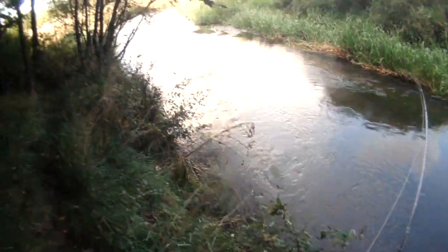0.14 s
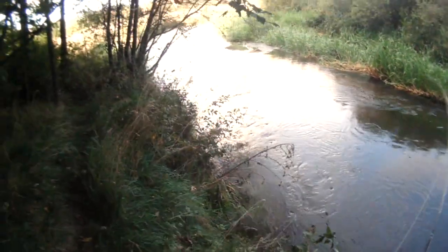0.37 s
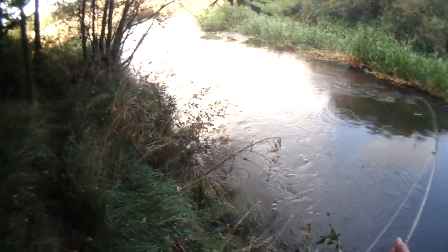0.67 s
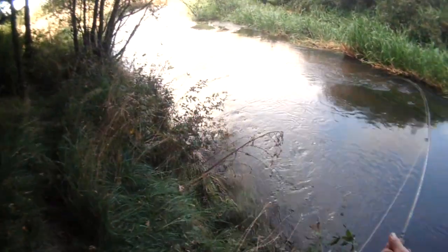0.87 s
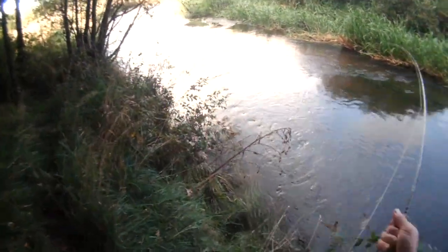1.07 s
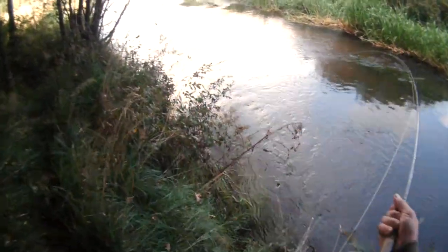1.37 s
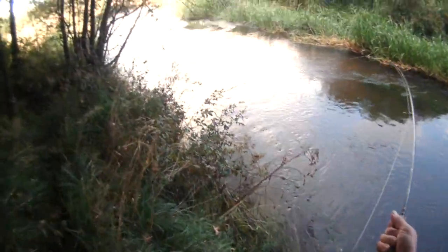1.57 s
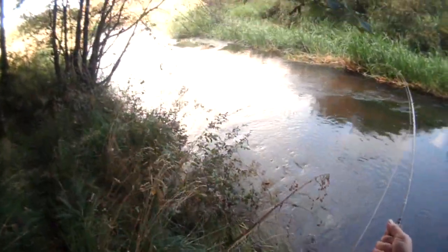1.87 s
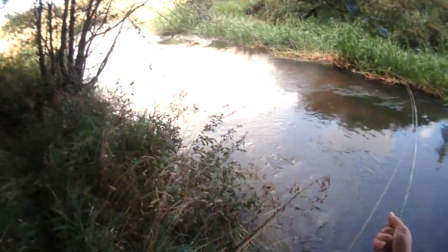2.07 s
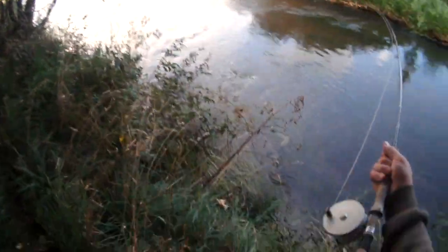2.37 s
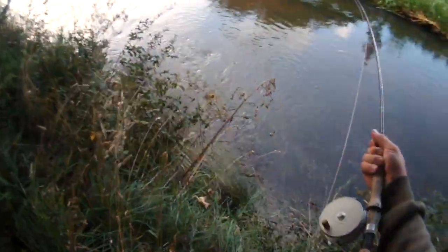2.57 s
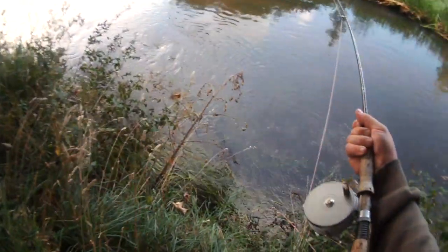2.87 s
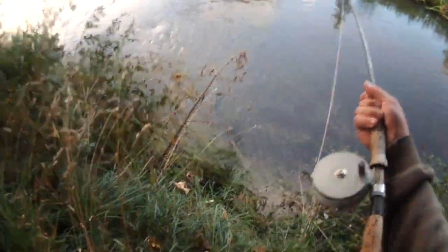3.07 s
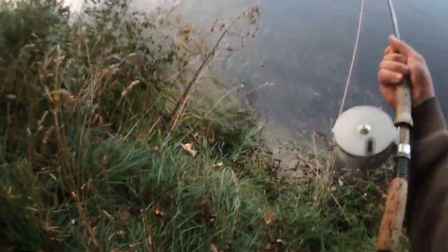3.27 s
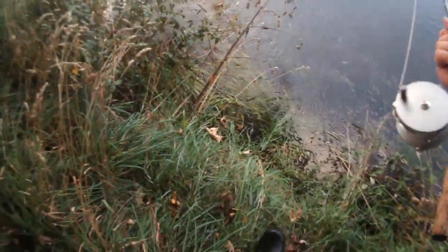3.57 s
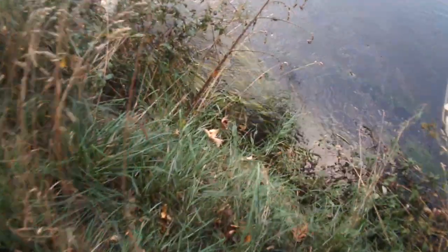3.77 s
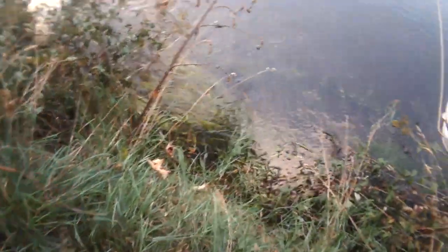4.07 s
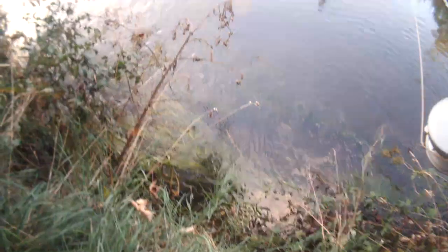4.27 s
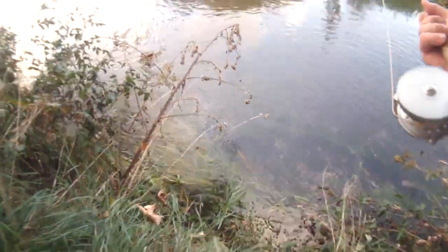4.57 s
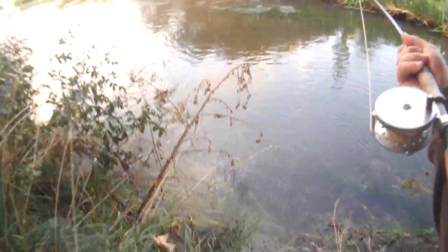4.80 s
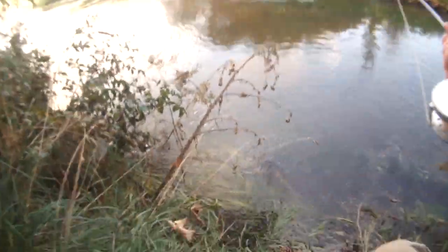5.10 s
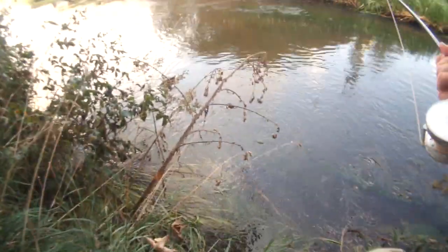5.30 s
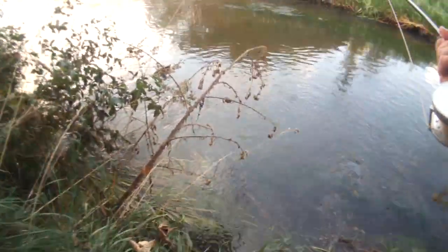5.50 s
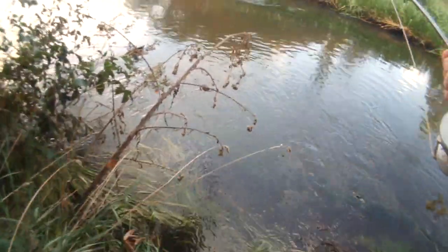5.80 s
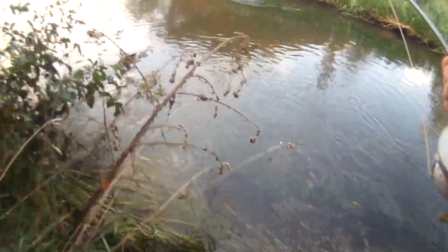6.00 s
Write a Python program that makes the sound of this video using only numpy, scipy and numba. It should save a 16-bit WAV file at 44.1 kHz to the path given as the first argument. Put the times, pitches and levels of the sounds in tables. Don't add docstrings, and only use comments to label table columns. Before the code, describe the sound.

Outdoors by a river, soft steady water hiss and low breeze rumble. After a couple of faint ticks, a metal fishing reel starts to buzz at 1.5 seconds, speeds up, sags, then surges faster and louder as it comes near. It slows abruptly into individual bright clicks, thinning out by 4.4 seconds. Dull knocks and cloth rubs on the small camera microphone follow, with one last click.

```python
import sys
import numpy as np
from scipy import signal
from scipy.fft import rfft, irfft, next_fast_len
from scipy.io import wavfile
from scipy.ndimage import uniform_filter1d, minimum_filter1d
from numba import njit

SR = 44100
rng = np.random.default_rng(int(sys.argv[2]) if len(sys.argv) > 2 else 0)


def put_to_file(sound):
    columns = np.atleast_2d(sound).T
    safe = np.clip(columns, -1, 1)
    whole_steps = np.round(safe * 32767)
    wavfile.write(sys.argv[1], SR, whole_steps.astype(np.int16))


def how_loud(loudness_db):
    steps = np.asarray(loudness_db, float) / 20
    return 10 ** steps


N = 270973

# (time [s], tooth rate [1/s])
FIRST_TUG = [
    (1.5332, 86.6),
    (1.6195, 164.6),
    (1.7389, 218.3),
    (1.8354, 231.0),
    (2.0906, 152.2),
    (2.2175, 151.3),
    (2.2857, 112.6),
    (2.3478, 114.7),
]
# (time [s], tooth rate [1/s])
SECOND_TUG = [
    (2.427, 182.6),
    (2.7005, 231.5),
    (2.8949, 219.9),
    (3.1728, 281.1),
    (3.3502, 265.8),
    (3.4457, 233.2),
    (3.5327, 155.5),
    (3.6236, 94.9),
    (3.6667, 85.5),
]
# (time [s], extra level around 400 Hz [dB])
CLOTH_STIR = [
    (0, -3.5),
    (1.1, -2),
    (2.2, -0.4),
    (3.3, -2),
    (4.3, 0.1),
    (4.6, 1.5),
    (5.2, 4),
    (5.6, 0.9),
    (6.14, -0.5),
]


def reel():
    s, near_db, lone, turn, parts_db = pawl_impacts()
    since = np.arange(512) / SR - (s * SR % 1)[:, None] / SR
    ticks = crack(since, near_db) + reel_modes(since, near_db, lone, turn, parts_db)
    out = np.zeros(N)
    for when, tick in zip(s, ticks):
        add(out, when, tick)
    return out + scattered_tail(out)


def pawl_impacts():
    # (time [s], peak level [dB], extra level of the seat [dB])
    far_ticks = [
        (0.1272, -34.5, -0.5),
        (1.2458, -30.5, -5),
        (1.4204, -35, -10),
        (1.4508, -34, -11),
        (1.4711, -36, -4),
        (1.4885, -35, -8),
        (1.5046, -35.5, -1.5),
        (1.52, -37, 1),
    ]
    # (time [s], peak level [dB], extra level of the seat [dB])
    near_ticks = [(3.6779, -23, 1), (3.691, -23, 0), (3.7068, -22, 1), (3.7257, -24, 0), (3.7503, -22.5, 0),
                  (3.7788, -21.5, 0), (3.8502, -22.5, 3), (3.8855, -22, -2), (3.9207, -21, -4),
                  (3.9741, -21.5, -4), (4.2398, -22.5, -2), (4.3012, -22.5, 1), (4.344, -23.5, 7),
                  (4.3926, -23, -1), (5.4109, -24, 2)]
    lone_rows = []
    # (post, frame, plate, rim) [dB]
    for rows, extra_db in ((far_ticks, (-1.5, -1.5, 3.3, 2.8)), (near_ticks, (-4.5, 4.5, 4, 2.5))):
        lone_rows.append([(s, db + 34, 1, seat_db, *extra_db) for s, db, seat_db in rows])
    far, near = lone_rows
    s, near_db, lone, seat_db, post_db, frame_db, plate_db, rim_db = np.vstack([far, run_ticks(), near]).T
    turn = (np.arange(len(s)) - len(far)) / 45
    return s, near_db, lone, turn, (seat_db, post_db, frame_db, 0, plate_db, rim_db)


def run_ticks():
    # (time [s], level [dB])
    run_level = [
        (1.54, -47.5),
        (1.7, -43.5),
        (2.36, -44),
        (2.4, -40.5),
        (3.14, -34.5),
        (3.16, -32),
        (3.26, -34),
        (3.34, -32),
        (3.66, -35.5),
    ]
    far_db, lead_s, uneven_s = -69, 0.001094, 1.5e-5
    t = np.arange(int(FIRST_TUG[0][0] * SR), int(SECOND_TUG[-1][0] * SR) + 100) / SR
    teeth = np.cumsum(speed(t)) / SR
    s = np.interp(np.arange(int(teeth[-1]) + 1), teeth, t)
    near_db = np.interp(s, *np.transpose(run_level)) - 10 * np.log10(speed(s)) - far_db
    s = s - lead_s + uneven_s * rng.standard_normal(len(s))
    return np.column_stack([s, near_db, np.zeros((len(s), 6))])


def speed(t):
    # (share of speed [ratio], frequency [Hz], time of a crest [s], time when strongest [s], spread [s])
    rod_swings = [
        (.0732, 4.8711, 2.9584, 2.9509, .3378),
        (.0277, 9.0013, 1.9036, 2.1106, .5641),
        (.016, 10.3297, 2.9707, 1.0, 2.6),
    ]
    tug = 0
    for share, hz, crest, middle, spread in rod_swings:
        tug = tug + share * np.cos(2 * np.pi * hz * (t - crest)) * np.exp(-((t - middle) / spread) ** 2)
    return np.interp(t, *np.transpose(FIRST_TUG + SECOND_TUG)) * (1 + tug)


def crack(since, near_db):
    noise = uniform_filter1d(rng.standard_normal(since.shape), size=2, axis=0)
    blow = np.maximum(since, 0) / 0.00051
    return how_loud(near_db - 53.5)[:, None] * 2.4 * band(noise, 10000, 13600) * blow * np.exp(1 - blow)


def reel_modes(since, near_db, lone, turn, parts_db):
    # (frequency [Hz], level when far [dB],
    # decay time t60 [s], gain per nearness [dB/dB], swing over a turn [dB], angle of the loudest [turns])
    metal_modes = [(1836, -42, 0.013, 0.4359, 3.5, 0.39), (2183, -45.5, 0.014, 1.2925, 3, 0.53),
                   (2383, -54, 0.009, 1.4454, -1, 0.15), (2960, -59, 0.018, 0.88, 1, 0),
                   (4030, -49, 0.017, 0.98, 1, 1), (4400, -52.5, 0.0074, 0.54, 6, 0.92),
                   (4950, -58, 0.0051, 1.9, 0, 0.37), (5756, -35.5, 0.0062, .5, 4.5, 0.58),
                   (6004, -38.5, 0.0076, 1.1441, 2, 0.46), (6610, -33, 0.0044, 0.66, 2.5, 0.09),
                   (6960, -54, 0.0054, 1.64, -8.5, 0.03),
                   (7850, -50.5, 0.009, 1.39, 3.1, 0), (8640, -56, 0.0042, 1.96, 3.5, 0.77),
                   (9250, -58, 0.0044, 0.9, 5, 0.82), (10150, -73, 0.0052, 2.1, -10, 0.33),
                   (10800, -48.5, 0.0048, 1.39, -0.8, .7), (11320, -46, 0.0056, 0.66, -1.5, .2),
                   (12100, -44.5, 0.0051, 0.88, 0, .53), (13250, -47.5, 0.0046, 1.31, 4, 0),
                   (13730, -42.5, 0.0058, 0.77, -1, 0.9), (14460, -55, 0.0086, 0.57, 1, .55),
                   (15100, -62, 0.0044, 1, 6, .5), (16300, -61, .004, -2.5, .5, .5)]
    part_tops_hz = [1960, 2280, 4240, 7300, 9800]
    heavy_top_hz, frame_lag_s = 3400, 0.00059
    count = len(near_db)
    bounce_s = 0.001104 * (1 + 0.025 * walk(count, 4) + 0.014 * rng.standard_normal(count))
    scatter_db = 1.17 * np.where(lone, 1.6, 1)
    rings = []
    for k, (hz, db, t60, share, swing_db, loudest) in enumerate(metal_modes):
        heavy = hz < heavy_top_hz
        part_db = parts_db[np.searchsorted(part_tops_hz, hz, side="right")]
        shade = 0.26 + 0.096 * np.clip(near_db, 0, 12) if heavy else 1
        turning_db = shade * swing_db * np.cos(2 * np.pi * (turn - loudest))
        chance_db = 1.1 * walk(count, 7) + scatter_db * rng.standard_normal(count)
        heard = how_loud(db + part_db + share * near_db + turning_db + chance_db)
        pitch = hz * (1 + 0.006 * walk(count, 5))
        pole = 2j * np.pi * pitch - np.log(1000) / t60
        for start, gain in ((0 * bounce_s, 1), (bounce_s, how_loud(-4))):
            rings.append((start + frame_lag_s * heavy, pole, (-1) ** k * gain * heard))
    start, pole, gain = np.moveaxis(rings, 1, 0)
    return swell(since, start.real, pole, gain, rise_s=0.00041)


def swell(since, start, pole, gain, rise_s):
    first = np.ceil((start - since[:, 0]) * SR).astype(np.int64)
    t = since[:, 0] + first / SR - start
    turn, step = gain * np.exp(pole * t), np.exp(pole / SR)
    left, fade = np.exp(-t / rise_s), np.exp(-1 / (rise_s * SR))
    return ring(first, turn, step, left, fade, since.shape[1])


@njit
def ring(first, turn, step, left, fade, size):
    out = np.zeros((turn.shape[1], size))
    for m in range(turn.shape[0]):
        for k in range(turn.shape[1]):
            z, rest = turn[m, k], left[m, k]
            for i in range(first[m, k], size):
                out[k, i] += (1 - rest) * z.imag
                z, rest = z * step[m, k], rest * fade
    return out


def scattered_tail(sound):
    t = np.arange(2048) / SR
    tail = rng.standard_normal(len(t)) * np.exp(-np.log(1000) * t / 0.04) * np.minimum(t / 0.0042, 1)
    return how_loud(-33) * signal.fftconvolve(sound, tail)[:N]


def hand():
    return knocks() + rubs() + patter()


def knocks():
    # (time [s], peak level [dB], ring frequency [Hz])
    housing_knocks = [(1.185, -54, 487), (1.218, -48, 495), (1.356, -48, 525), (1.937, -42, 503),
                      (2.344, -37, 336), (2.356, -39.5, 336), (2.404, -43.5, 552), (2.48, -42.5, 439),
                      (2.598, -38.5, 328), (2.693, -43, 503), (3.298, -36, 520), (3.762, -40.5, 436),
                      (3.794, -36.5, 443), (4.531, -39.5, 285), (4.765, -36.5, 480), (4.799, -37, 361),
                      (4.92, -42.5, 250), (4.959, -41.5, 476), (4.994, -51, 250), (5.085, -40, 385),
                      (5.192, -38, 376), (5.551, -40, 314), (5.863, -40, 493), (5.976, -42, 398),
                      (6.021, -39, 390), (6.0366, -31, 430), (6.042, -38.5, 320), (6.081, -44, 476)]
    out, t = np.zeros(N), np.arange(1024) / SR
    for s, db, hz in housing_knocks:
        decay = np.exp(-2.5 * t * hz / 1.44)
        onset = np.minimum(t * hz * 1.14, 1)
        add(out, s, 4.1 * how_loud(db) * np.sin(2 * np.pi * hz * t) * decay * onset)
    return out


def rubs():
    # (time [s], length [s], level [dB], centre frequency [Hz])
    cloth_rubs = [(0.9867, 0.008, -51.5, 1990), (0.99, .014, -64, 4200), (3.763, .003, -54, 4000),
                  (3.769, 0.0037, -52, 4000), (4.533, 0.0074, -59, 1600), (4.748, 0.008, -53.5, 1600),
                  (5.072, 0.036, -56, 2020), (5.075, 0.028, -64, 4300), (5.824, 0.013, -60, 2040),
                  (5.847, 0.063, -63, 1950), (5.939, 0.17, -64.5, 1890)]
    out = np.zeros(N)
    for s, length, db, hz in cloth_rubs:
        chance = rng.standard_normal(8192)
        snaps = band(chance ** 3 / 4, hz, 0.26 * hz)[:int(length * SR)]
        add(out, s, how_loud(db + 21.0) * snaps * np.sqrt(np.hanning(len(snaps))))
    return out


def patter():
    contacts = rng.standard_normal(N) * (rng.random(N) < 60 / SR)
    contacts = contacts * how_loud(np.interp(np.arange(N) / SR, *np.transpose(CLOTH_STIR)))
    return how_loud(-19.5) * band(band(contacts, 306, 380), 306, 380)


def bank():
    # (frequency [Hz], level per Hz [dB])
    bank_spectrum = [(13, -46), (22, 4.5), (59, -0.5), (135, -12.5), (173, -13), (396, -15), (430, -12.5),
                     (1040, -23.5), (1750, -21.5), (2010, -20.5), (2640, -26), (3030, -26.5), (3880, -27),
                     (13800, -32.5), (15800, -35)]
    size = next_fast_len(N, True)
    f = np.fft.rfftfreq(size, 1 / SR) + 1e-9
    hz, db_per_hz = np.transpose(bank_spectrum)
    noise = rfft(rng.standard_normal(size)) * how_loud(np.interp(np.log(f), np.log(hz), db_per_hz))
    noise = noise * how_loud(-49.5) / np.std(irfft(noise, size))
    stir_db = np.interp(np.arange(N) / SR, *np.transpose(CLOTH_STIR))
    rustle, breeze_db = slow(25), breeze()
    out = 0
    for octave in np.arange(3, 15, 0.5):
        share = np.cos(np.pi / 2 * np.clip(2 * (np.log2(f) - octave), -1, 1)) ** 2
        cloth = np.exp(-(octave - np.log2(380)) ** 2 / 1.08)
        cloth_hiss = np.exp(-(octave - np.log2(2000)) ** 2 / 0.2)
        gusty = np.clip(2 * (np.log2(140) - octave), 0, 1)
        db = cloth * (stir_db + 4.6 * rustle) + (0.5 + 1.1 * cloth) * slow(12)
        db = db + gusty * breeze_db + 0.69 * stir_db * cloth_hiss
        out = out + how_loud(db) * irfft(noise * share, size)[:N]
    return out


def breeze():
    # (time [s], extra level of rumble [dB])
    wind_puffs = [(0.05, 2), (0.17, 7.5), (1.39, 5), (1.61, 3.5), (2.17, 4), (2.49, 2), (2.61, 11.5),
                  (3.52, 4), (4.05, 3), (4.87, 7.5), (5.04, 6), (5.16, 6.5), (5.6, 5), (5.76, 6)]
    calm_db, eddy_db, puff_s = -2, -0.1, 0.032
    t = np.arange(N) / SR
    puffs_db = sum(db * np.exp(-((t - s) / puff_s) ** 2) for s, db in wind_puffs)
    return calm_db + eddy_db * slow(8) + puffs_db


def slow(rate):
    return np.repeat(walk(N // 64 + 1, SR / 64 / rate), 64)[:N]


def walk(count, hold):
    k = max(int(hold), 1)
    steps = np.repeat(rng.standard_normal(count // k + 1), k)
    return 0.82 * uniform_filter1d(uniform_filter1d(steps, k), k)[:count]


def band(x, hz, width):
    return signal.lfilter(*signal.iirpeak(min(hz, 0.45 * SR), hz / width, fs=SR), x)


def add(out, s, sound):
    i = int(s * SR)
    out[i:i + len(sound)] += sound[:len(out) - i]


def scene():
    return (reel() + hand() + bank())[None]


def top_cut(x):
    return signal.sosfilt(signal.butter(12, 16990, fs=SR, output="sos"), x)


def low_pass(x, top_hz):
    return signal.sosfiltfilt(signal.ellip(12, 0.1, 40, top_hz, fs=SR, output="sos"), x)


def record(dry):
    wide, narrow = low_pass(dry, 16520), low_pass(dry, 15820)
    power = uniform_filter1d(np.diff(dry, 2, prepend=[[0, 0]]) ** 2, 64) + 1e-14
    contrast = 1 / minimum_filter1d(power, 700) / minimum_filter1d(1 / power, 700)
    sudden = uniform_filter1d(1.0 * (contrast > how_loud(2 * 25)), 128)
    mix = narrow + sudden * (wide - narrow) + 0.0052
    return top_cut(mix)


dry = scene()
out = record(dry)
put_to_file(out)
```